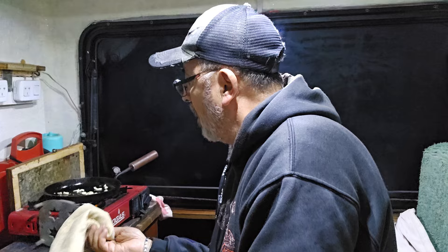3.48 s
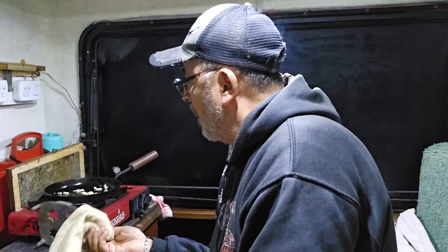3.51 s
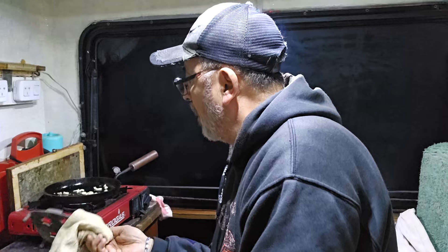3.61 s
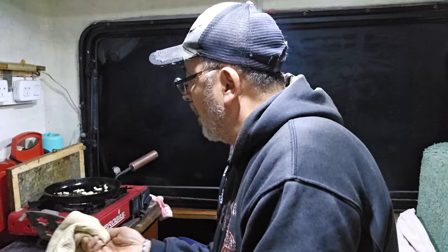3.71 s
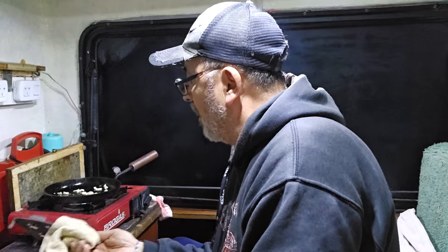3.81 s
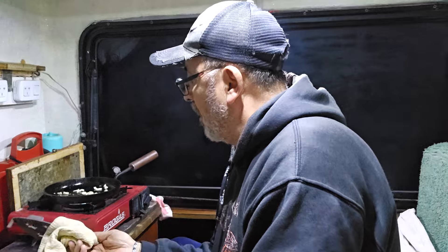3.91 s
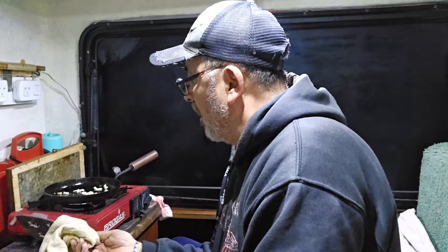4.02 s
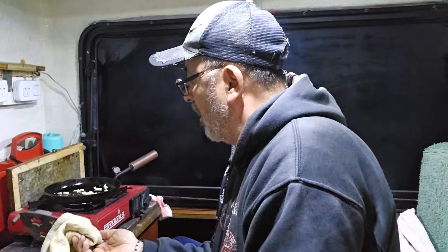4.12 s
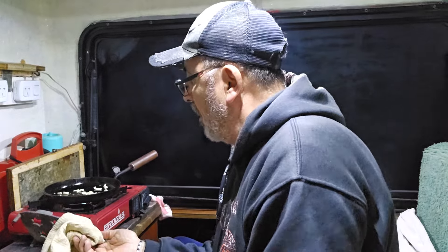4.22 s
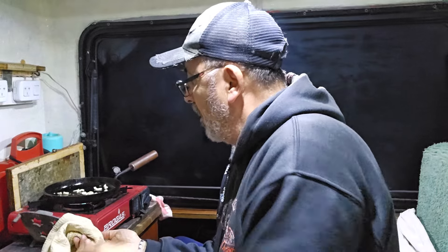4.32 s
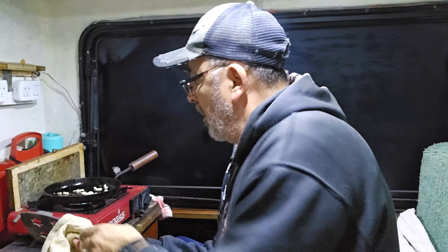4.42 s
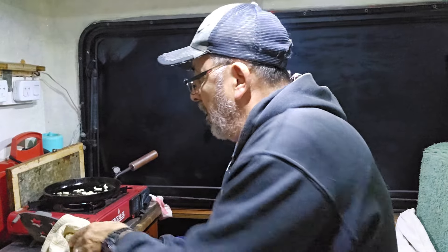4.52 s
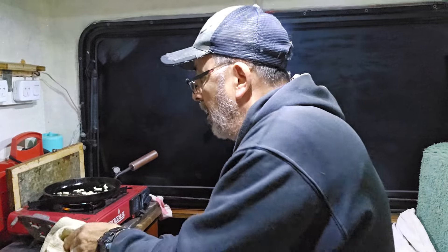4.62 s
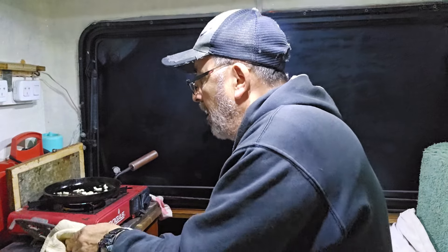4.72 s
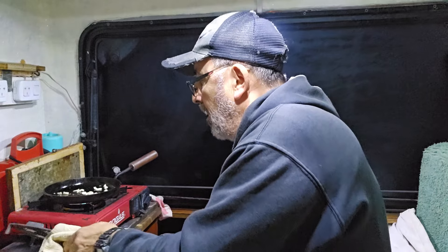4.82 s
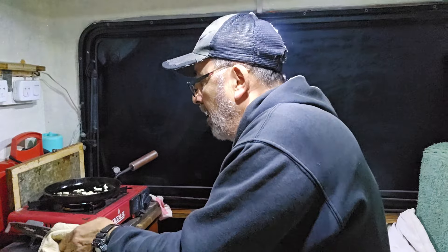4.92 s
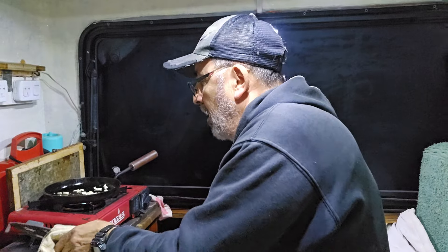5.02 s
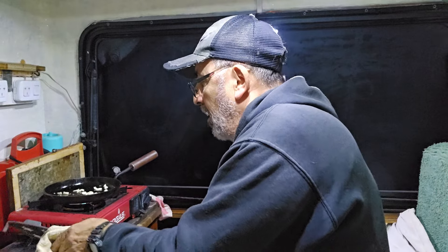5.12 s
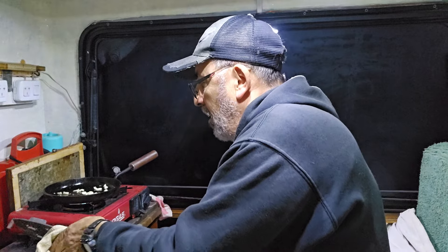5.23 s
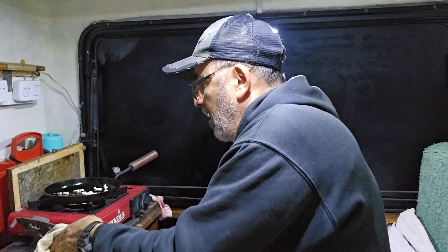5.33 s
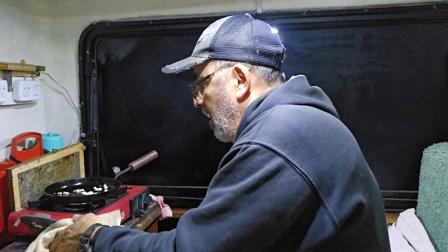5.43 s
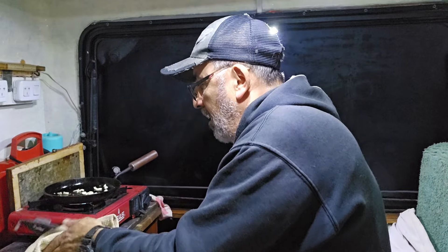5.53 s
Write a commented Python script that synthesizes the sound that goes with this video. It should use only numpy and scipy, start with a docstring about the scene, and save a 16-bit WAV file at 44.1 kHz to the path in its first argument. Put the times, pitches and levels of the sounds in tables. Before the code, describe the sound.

Garlic fries gently in a pan on a small gas stove, with hollow pops and a few knocks on the worktop.

```python
"""Garlic frying on a camping stove

Garlic fries gently in a metal pan on a portable gas stove in a small, dry cabin. The bed is a low
rumble under the soft hiss of flame and oil. Pops in the pan and knocks on the worktop ring the pan
and the hollow stove case and thud in the cabin's low modes. Droplets snap, the oil spits once in a
longer double burst, and a steel spatula rings faintly as it is laid down."""
import sys
import numpy as np
from scipy import signal
from scipy.fft import rfft, irfft
from scipy.io import wavfile
from scipy.ndimage import uniform_filter1d

SR = 44100
rng = np.random.default_rng(int(sys.argv[2]) if len(sys.argv) > 2 else 0)


def wrap_up_sound(samples):
    """Save the sound to the file named by the first command line argument, as 16-bit audio."""
    columns = np.atleast_2d(samples).T
    # keep every value between -1 and 1, then stretch to whole-number steps
    tamed = np.clip(columns, -1, 1)
    steps = np.round(tamed * 32767).astype(np.int16)
    wavfile.write(sys.argv[1], SR, steps)


N = 245328
TAIL = 32768  # samples in one hit or one reverb tail

# reverb time of the cabin: f/Hz, t60/s
CABIN_DECAY = [(100, 0.69), (300, 0.5), (550, 0.18), (1200, 0.3), (3000, 0.19), (7000, 0.17),
               (15000, 0.091)]
# how alike diffuse sound is left and right: f/Hz, correlation
STEREO_LIKENESS = [(60, 0.89), (290, 0.85), (640, 0.37), (1400, 0), (16000, 0.039)]
# left microphone minus right: f/Hz, level/dB
MIC_BALANCE = [(120, 0.5), (260, -1), (500, 1.5), (2000, 0.5), (4000, 0), (8000, -2.8), (13000, -4)]
# EQ curves of the low rumble, the flame-and-oil hiss and the spitting: f/Hz, level/dB
RUMBLE_EQ = [(15, -7), (32, 3), (65, 0.5), (100, -4.5), (150, -6), (205, -16), (265, -7), (320, -21.5),
             (390, -30), (700, -48)]
HISS_EQ = [(350, 5.5), (520, 8.5), (660, 4), (900, 6.5), (1400, -1), (3400, 2), (6000, 0), (9000, -2.5),
           (10700, -1.5), (11600, 4), (13300, -1.5), (16000, 0)]
SPIT_EQ = [(300, 2), (500, 5), (1000, 9), (2200, 1.5), (4500, 0.5), (9000, -2), (12500, 7.5), (16000, 3.5)]
# whistling bands of the gas jet: f/Hz, width/Hz, level/dB
JET_BANDS = [(1700, 190, 7), (4673, 32, 11.5), (7160, 200, 2.5), (11840, 190, 1)]
# resonances of the pan on its stove, at full coupling: f/Hz, width/Hz, level/dB
STOVE_BANDS = [(375, 110, -20), (468, 22, 13), (536, 34, 15), (615, 50, -11), (655, 20, 2), (740, 110, -6),
               (820, 34, 5), (1067, 26, 10), (1250, 50, 5), (1852, 26, 8), (2153, 22, 8), (2320, 26, 12),
               (2448, 18, 8), (3055, 24, 7), (3820, 34, 7), (4830, 28, 4), (5590, 36, 7), (9800, 2500, -4)]
# ringing modes: f/Hz, relative level/dB, t60/s
PAN_MODES = [(657, -10, .25), (1023, -14, .4), (1873, -15, .28), (2153, -11, .3), (2320, 0, .25),
             (3061, 0, .27), (3144, -15, .3), (4329, -13, .52)]
SPATULA_MODES = [(1016, -2.5, 0.99), (1448, -1, .5), (1610, -6, 0.82), (2930, -2, .3)]
CABIN_MODES = [(44.3, -7.5, 0.62), (65.6, -11.5, 0.64), (77.23, -0.5, 0.44), (91.6, -2, 0.25),
               (126.5, -5, 0.28), (172.5, -7, 0.14), (220.3, -12.5, 0.31)]  # low boom of worktop and cabin
# peaks of the bubble rushes from wet garlic: t/s, level/dB
SPIT_CUES = [(2.813, -52.5), (2.916, -50.5)]
# hits: t/s, level/dB, treble tilt/(dB per octave), thud level/dB, clink f/Hz, clink boost/dB
KNOCK_CUES = [(.001, -56, -.3, -47, 2960, 3), (.275, -53, -4, -48, 1610, 12.5),
              (.343, -58.5, -1.1, -47.5, 2050, 7), (.537, -42.5, -4, -43.5, 890, 9),
              (.809, -54.5, -12, -54, 337, 21), (3.497, -64, -3, -69, 1070, 21),
              (3.655, -50, -2, -63, 2230, 5), (3.757, -56, -5.5, -55.5, 970, 5),
              (3.889, -42.5, -0.65, -42.5, 2240, 21), (3.925, -47, -2.5, -43.5, 1430, 5),
              (4.025, -64, -10, -56, 1030, -4), (4.240, -57, -7, -57.5, 910, 8),
              (4.453, -56, -6.5, -57.5, 1550, 0), (5.057, -64.5, -9, -70, 1190, 4),
              (5.341, -52.5, -2, -44.5, 780, 11), (5.502, -41, -0.7, -40, 1180, 6)]  # things handled on the worktop
SNAP_CUES = [(.755, -54.5, 5, -68, 5100, 13), (.791, -58, 4, -63, 5260, 8), (1.386, -71.5, 3, -71, 2060, 9),
             (4.613, -89, 9.5, -95, 5070, -4)]  # droplets bursting in hot oil
POP_CUES = [(1.111, -57, -10, -58, 486, 2), (1.738, -44.5, -6, -48, 2290, 11),
            (2.229, -37.5, -1, -44.5, 1210, 3.5), (2.353, -45, -4.5, -47, 2190, 12),
            (2.436, -52, -9.5, -50.5, 480, 4), (2.564, -71.5, -1, -69, 990, 13),
            (2.859, -55, 1.44, -52, 2100, 4), (2.915, -54.5, -0.5, -59, 2100, 6),
            (3.016, -39, -0.8, -44.5, 2200, 3.5), (3.56, -33, 0, -41, 2270, 8.5)]  # hollow pops in the pan
# edges of a hit's six registers (body, hollow, knock, crack, bright, snap): f/Hz
REGISTER_EDGES = [160, 400, 700, 1500, 3000, 6000, 17000]
# voicing of each kind of hit, added to its cue level register by register: level/dB
KNOCK_VOICING = [-3.5, -7.5, -0.85, 1.05, -2.7, -7.5]
SNAP_VOICING = [6, -0.5, -4, -0.5, -1.5, -10.5]
POP_VOICING = [-14.5, -3, -2.35, 1.5, -2.94, -7]


def undb(db):
    """Decibels to gain."""
    return 10 ** (np.asarray(db) / 20)


def rms(x):
    """Average signal level, never quite zero."""
    return np.sqrt(np.mean(x ** 2)) + 1e-12


def decay(t, t60):
    """Envelope that falls 60 dB in t60 seconds."""
    return np.exp(-np.log(1000) * t / t60)


def bins(size):
    """Spectrum frequencies in Hz for `size` samples."""
    return np.maximum(np.arange(size // 2 + 1) * SR / size, 1)


def over_hz(table, hz):
    """Read a curve on a log-frequency axis."""
    f, value = np.transpose(table)
    return np.interp(np.log(hz), np.log(f), value)


def eq(x, curve):
    """Colour a sound with a curve of f/Hz, level/dB."""
    return irfft(rfft(x) * undb(over_hz(curve, bins(x.shape[-1]))), x.shape[-1])


def causal_eq(x, log_gain):
    """Minimum-phase EQ, which keeps an attack free of pre-ring."""
    cepstrum = irfft(log_gain)
    cepstrum[1:TAIL // 2] *= 2
    cepstrum[TAIL // 2 + 1:] = 0
    return irfft(rfft(x) * np.exp(rfft(cepstrum)))


def band(x, lo_hz, hi_hz):
    """Causal band-pass."""
    return signal.sosfilt(signal.butter(4, [lo_hz, hi_hz], "band", fs=SR, output="sos"), x)


def resonate(x, peaks):
    """Bell filters of f/Hz, width/Hz, level/dB; a negative level cuts a notch."""
    f, gain = bins(x.shape[-1]), 1
    for hz, width, db in peaks:
        gain = gain * (1 + (undb(db) - 1) / (1 + 1j * hz / width * (f / hz - hz / f)))
    return irfft(rfft(x) * gain, x.shape[-1])


def drift(rate_hz):
    """Smooth random modulation at unit RMS."""
    hold = int(SR / rate_hz)
    steps = np.repeat(rng.standard_normal(N // hold + 1), hold)
    slewed = uniform_filter1d(uniform_filter1d(steps, hold), hold)[:N]
    return slewed / rms(slewed)


def add(out, at_s, x):
    """Mix a sound in at its cue."""
    start = int(at_s * SR)
    out[:, start:start + x.shape[1]] += x[:, :N - start]


def diffuse(size):
    """Noise from all around: narrow in the bass, wide in the treble."""
    mid, side = rfft(rng.standard_normal((2, size)))
    alike = over_hz(STEREO_LIKENESS, bins(size))
    mid, side = mid * np.sqrt((1 + alike) / 2), side * np.sqrt((1 - alike) / 2)
    return irfft(np.array([mid + side, mid - side]), size)


def cabin(direct=7.56, build_s=0.00024, wall=0.51, wall_s=0.0068, wall_width_s=0.0069):
    """The cabin's impulse response: a direct tick, then dense reflections whose treble dies first."""
    t = np.arange(TAIL) / SR
    air, f = rfft(diffuse(TAIL)), bins(TAIL)
    hz, t60s = np.transpose(CABIN_DECAY)
    crossovers = [np.interp(np.log(f), np.log(hz), row) for row in np.eye(len(hz))]
    response = sum(irfft(air * share) * decay(t, t60) for share, t60 in zip(crossovers, t60s))
    far_wall = 1 + wall * np.exp(-((t - wall_s) / wall_width_s) ** 2)
    response *= (1 - np.exp(-t / build_s)) * far_wall
    response[0, 10] += direct  # reaches the left microphone 10 samples later
    response[1, 0] += direct
    return response


def rumble(level_db=-58, waver_db=1.5, shudder_db=-9, shudder_t60_s=2):
    """Low murmur of burner and cabin, swelling with the thud of each pop and knock."""
    murmur, t = eq(diffuse(N), RUMBLE_EQ), np.arange(N) / SR
    power = undb(level_db) ** 2
    for at_s, _, _, thud_db, _, _ in POP_CUES + KNOCK_CUES:
        shudder = undb(thud_db + shudder_db) * decay(np.abs(t - at_s), shudder_t60_s)
        power = power + (t >= at_s) * shudder ** 2
    return murmur / rms(murmur) * np.sqrt(power) * undb(waver_db * drift(rate_hz=3.8))


def fizz(per_second, spread_db):
    """Countless tiny bubbles bursting, smeared by the cabin."""
    sizes = undb(spread_db * np.minimum(rng.exponential(size=N), 5)) * rng.choice([-1, 1], N)
    bursts = sizes * (rng.random(N) < per_second / SR)
    wash = signal.fftconvolve(bursts[None], cabin(), axes=1)[:, :N]
    return wash / rms(wash)


def simmer(treble_db=-70, oil_db=-8, flicker_db=0.43, swell_db=2.5, swell_s=1.28, swell_width_s=0.098):
    """The gas flame's hiss with the oil's fine sizzle; together they swell once for a moment."""
    flame = resonate(diffuse(N), JET_BANDS)
    oil = undb(oil_db) * fizz(per_second=700, spread_db=3.5)
    hiss = eq(flame + oil, HISS_EQ)
    swell = np.exp(-((np.arange(N) / SR - swell_s) / swell_width_s) ** 2)
    fader_db = treble_db + swell_db * swell + flicker_db * drift(rate_hz=6.8)
    return hiss / rms(band(hiss, 5000, 16000)) * undb(fader_db)


def spit(rise_db_per_s=305, fall_db_per_s=262):
    """Wet garlic lets off short rushes of bubbles, coloured by the pan and stove."""
    t = np.arange(N) / SR
    bubbles = eq(resonate(fizz(per_second=1400, spread_db=2.5), STOVE_BANDS), SPIT_EQ)
    envelope = sum(undb(db - np.maximum(rise_db_per_s * (peak_s - t), fall_db_per_s * (t - peak_s)))
                   for peak_s, db in SPIT_CUES)
    return bubbles / rms(bubbles) * envelope


def ring(modes, scatter_db=1, detune=0.0002, width_rad=0.45):
    """Decaying sine modes, varied at each hit in level, pitch and stereo phase."""
    t, out = np.arange(TAIL) / SR, 0
    for hz, db, t60 in modes:
        size, shift, left, right = rng.standard_normal(4)
        phase = 2 * np.pi * hz * (1 + detune * shift) * t + width_rad * np.array([[left], [right]])
        out = out + undb(db + scatter_db * size) * decay(t, t60) * np.sin(phase)
    return out


def spatula(at_s=3.889, gain_db=-62):
    """The steel blade rings on thinly as it is laid down."""
    out = np.zeros((2, N))
    add(out, at_s, undb(gain_db) * ring(SPATULA_MODES))
    return out


def contacts(span_ms, count=12):
    """The force of a hit: a first touch, then fading contacts scattered over span_ms."""
    force = np.zeros(TAIL)
    lateness = (np.arange(count) + rng.uniform(0.16, 1, count)) / count
    force[(lateness * span_ms * SR / 1000).astype(int)] = np.exp(-lateness) * rng.choice([-1, 1], count)
    force[0] = 0.99
    return force


def whiten(burst, smooth_bins=90):
    """Flatten a burst's broad humps, so that the resonances it strikes give the colour."""
    power = np.mean(np.abs(rfft(burst)) ** 2, axis=0)
    return causal_eq(burst, -np.log(uniform_filter1d(power, smooth_bins) + 1e-12) / 2)


def voice(hit, register_db, tilt_db, attack, tilt_from_hz=856):
    """EQ each register of a hit's attack towards its level; harder contacts tilt the treble up."""
    edges = np.array(REGISTER_EDGES)
    centres = np.sqrt(edges[1:] * edges[:-1])
    octaves = np.maximum(np.log2(centres / tilt_from_hz), 0)
    levels = [rms(band(hit[:, :attack], lo, hi)) for lo, hi in zip(edges, edges[1:])]
    log_gain = np.log(undb(register_db + tilt_db * octaves) / levels)
    low_cut = [(60, log_gain[0] - 3.5), (170, log_gain[0])]
    return causal_eq(hit, over_hz([*low_cut, *zip(centres, log_gain)], bins(TAIL)))


def strike(cues, voicing_db, coupling, contact_ms, damping_per_s, thud_rise_s=0.009):
    """Hits in three layers: stove clatter (coupling 0-1 sets its resonance), pan ring and cabin thud."""
    out, t, shared_path = np.zeros((2, N)), np.arange(TAIL) / SR, cabin()
    attack, thud_attack = int(0.03 * SR), int(0.08 * SR)
    stove = [(hz, width, coupling * db) for hz, width, db in STOVE_BANDS]
    for at_s, db, tilt_db, thud_db, clink_hz, clink_db in cues:
        # every spot has its own way into the cabin and favours one resonance
        path = shared_path + 0.94 * cabin()
        clink = (clink_hz, 0.072 * clink_hz, clink_db)
        burst = whiten(irfft(rfft(path) * rfft(contacts(contact_ms))))
        clatter = resonate(burst, [*stove, clink]) * np.exp(-damping_per_s * t)
        add(out, at_s, voice(clatter, db + np.array(voicing_db), tilt_db, attack))
        # only strong hits set the whole pan ringing: 3 dB more ring per dB of hit
        metal, metal_db = ring(PAN_MODES), -47 + 3 * (db + 35)
        add(out, at_s, metal * undb(metal_db) / rms(metal[:, :attack]))
        thud = ring(CABIN_MODES, scatter_db=3.5, detune=0.042, width_rad=0.3)
        thud *= 1 - np.exp(-t / thud_rise_s)  # the low modes take a cycle to build up
        add(out, at_s, thud * undb(thud_db) / rms(thud[:, :thud_attack]))
    return out


def knocks():
    """Duller knocks that reach the stove only through the worktop."""
    return strike(KNOCK_CUES, KNOCK_VOICING, coupling=0.46, contact_ms=7.6, damping_per_s=5.9)


def snaps():
    """Droplets burst in the hot oil: light, sharp ticks that die at once."""
    return strike(SNAP_CUES, SNAP_VOICING, coupling=0.52, contact_ms=6.4, damping_per_s=33)


def pops():
    """Garlic pops in the pan and rings the hollow stove case."""
    return strike(POP_CUES, POP_VOICING, coupling=0.74, contact_ms=8.8, damping_per_s=6.9)


def scene():
    """The mix: hits up front, spitting behind them, hiss and rumble as the bed."""
    return pops() + knocks() + snaps() + spatula() + spit() + simmer() + rumble()


def record(dry, top_hz=15950):
    """Two microphones of slightly different colour, then a steep high cut."""
    balance_db = over_hz(MIC_BALANCE, bins(N)) * np.array([[0.5], [-0.5]])
    heard = irfft(rfft(dry) * undb(balance_db), N)
    return signal.sosfilt(signal.ellip(10, 0.2, 70, top_hz, fs=SR, output="sos"), heard)


dry = scene()
out = record(dry)
wrap_up_sound(out)
```